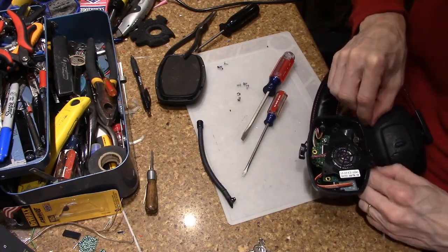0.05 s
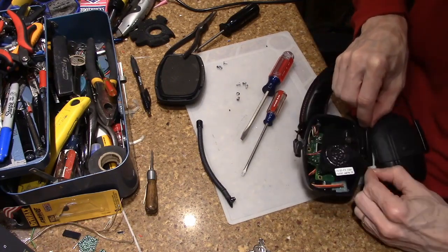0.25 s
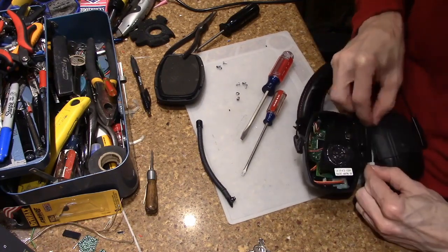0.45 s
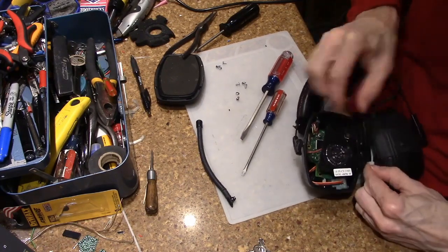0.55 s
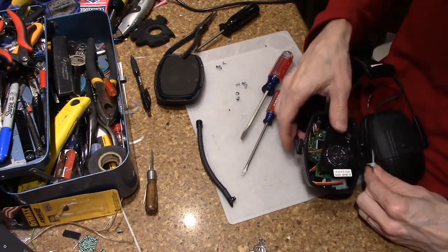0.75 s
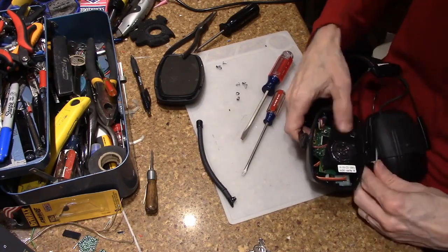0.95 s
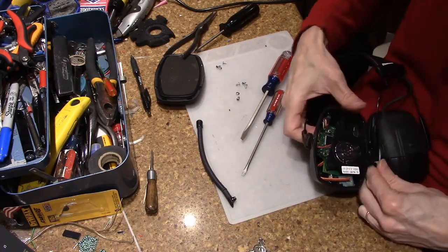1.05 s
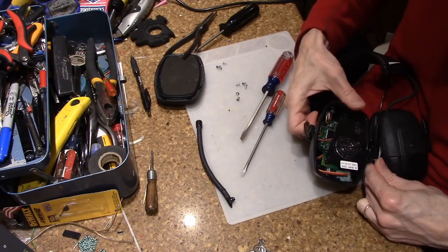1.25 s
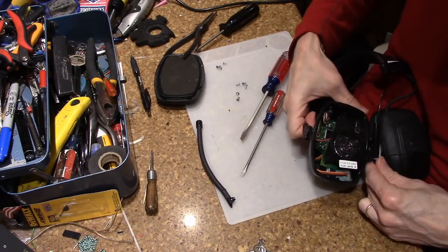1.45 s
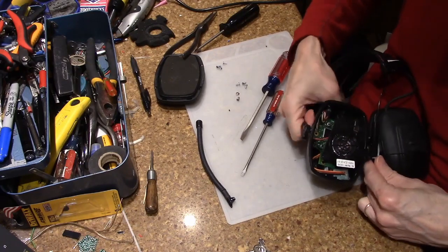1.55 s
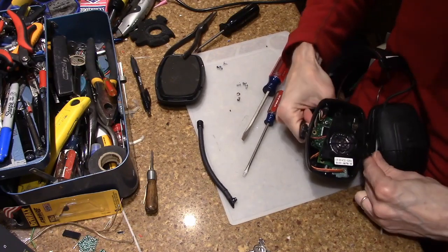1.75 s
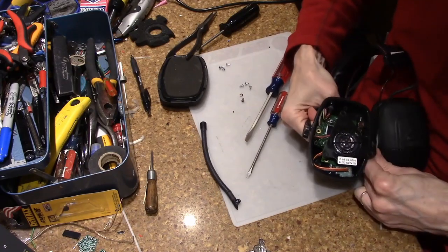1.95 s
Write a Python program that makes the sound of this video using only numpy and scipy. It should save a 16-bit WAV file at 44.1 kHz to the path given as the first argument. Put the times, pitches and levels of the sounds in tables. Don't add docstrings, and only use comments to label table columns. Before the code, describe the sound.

Plastic earmuff cups clatter sharply as a cable tie snaps tight, then small clicks and finger rubs

```python
import sys
import numpy as np
from scipy import signal
from scipy.fft import rfft, irfft
from scipy.io import wavfile

SR = 44100
rng = np.random.default_rng(int(sys.argv[2]) if len(sys.argv) > 2 else 0)


def natural_amplitude(level_db):
    exponent = np.asarray(level_db, float) / 20
    return 10 ** exponent


def master_out(mix):
    frames = np.transpose(np.atleast_2d(mix))
    ceiling = np.clip(frames, -1, 1)
    pcm = np.round(ceiling * 32767).astype(np.int16)
    wavfile.write(sys.argv[1], SR, pcm)


N = 88200
T = np.arange(N) / SR

# (time [s], peak level [dB], contact pitch [octaves from 2 kHz], chatter length [ms])
CUP_KNOCKS = [(.2315, -7.5, -0.7, 0.96), (.2318, -14, 1, 1.6), (.2445, -4.5, 1.4, 5.5), (.2462, -5, 0.9, 3),
              (.2505, -4, -0.4, 10.2), (.2618, -3.5, 1, 1.5), (.267, -8.5, -0.6, 2.7),
              (.2722, -14, 2.7, 2.3), (.2942, -8, 0, 1.18), (.2995, -14, 1, 3.6), (.3103, -11, -0.5, 1.1),
              (.3922, -22, 12, 1.7), (.3993, -24, 0.5, 2.2), (.421, -30, -1.4, 1.6)]
HEAD_SNAPS = [
    (.4404, -16.5, 1.24, 1.5),
    (.4431, -16.5, 0.25, 0.78),
    (.4478, -20, 1.4, 1.5),
    (.4547, -23, 1.6, 1.3),
    (.4662, -20, -1.1, 0.9),
    (.4658, -23.5, 1.15, 1.4),
]
LAST_TOOTH = [
    (1.2446, -24, 1.8, 2.6),
    (1.246, -11.5, 0.22, 0.94),
    (1.2505, -21, 0.053, 2.3),
    (1.2475, -26, -1.8, 9.5),
]
CUP_THUMPS = [
    (.9275, -24.5, -2.07, 2.3),
    (.936, -28.5, -1, 5.3),
    (0.96, -26, -2.3, 5.9),
    (.956, -31.5, -2.5, 3.4),
]
CUP_MORE_STRIKES = [(.232, -26, 3.5, 1.2), (.257, -10.5, -1.32, 6.1), (.271, -13, -1, 1.63), (.274, -9, -0.7, 4),
                    (.304, -18, 0.5, 3.9), (.437, -27, -1.4, 3.3), (.9415, -35, -1.4, 2.4),
                    (.964, -33, -0.3, 4.8), (.897, -39, -1.5, 2.5), (.036, -40, -3, 6.5), (.672, -51, 2.2, 3),
                    (1.256, -39.5, 5.7, 1.7), (1.279, -38, 1, 2)]
SHELL_PINGS = [(.254, -9.5, -1.28, 5.1), (.252, -13.5, -0.7, 5.6), (.295, -19.5, -0.4, 2.2),
               (.4665, -24, -0.9, 0.92), (.7952, -33.5, 0, 0.35), (.8445, -44.5, 1.8, 3),
               (.928, -34, -2, 1.2), (1.2455, -37, 1.5, 1.2), (1.2515, -42, 2.5, 4),
               (1.2925, -28, -0.14, 1), (1.3248, -34.5, -0.07, 1.1), (1.329, -40.5, -0.6, 2.7)]
PART_TICKS = [(.533, -34.5, 0.9, 10), (.636, -45, 0.1, 5.9), (.826, -43.5, -3.5, 4.3),
              (.8435, -37.5, 1.5, 6.4), (.860, -38, -0.5, 5), (.9035, -29, 0.1, 0.68),
              (1.0345, -34, 0.5, 3.4), (1.045, -32, -0.8, 5.8), (1.05, -44, -1.5, 3.7),
              (1.096, -36, -1, 6.4), (1.2642, -33, -0.1, 3), (1.2732, -29.5, -0.5, 2.1),
              (1.2924, -24, -0.1, 0.59), (1.2926, -32, 0.7, 1.1), (1.311, -33, 0.8, 1.8),
              (1.3245, -28, 0.03, 0.75), (1.327, -31.5, -1.5, 4), (1.358, -56, 5, 4.9),
              (1.37, -48, -1.5, 3.7), (1.469, -43.5, 1, 1.8), (1.477, -37, 0.3, 2.5), (1.556, -39, 0, 4.6),
              (1.673, -40, 0.8, 3.7)]
TIE_SCUFFS = [(.010, -27.5, 1.1, 2.1), (.1935, -29, 1.8, 0.86), (.194, -29.5, 0, 2.6),
              (.7682, -35, 1.2, 12), (.795, -30.5, -0.1, 1.4), (.8095, -33.5, -0.1, 2),
              (.843, -36, -0.5, 17), (1.002, -34.5, 1.3, 3.4), (1.175, -45, 7, 2.2),
              (1.2447, -42, -3.5, 2.2), (1.42, -51.5, 3, 35), (1.59, -45, 0.47, 115),
              (1.838, -48.5, 1.2, 47), (1.871, -39, -0.7, 2.3), (1.959, -43, 0.5, 1.9)]
SKIN_SCRAPES = [
    (.930, -33, 0.48, 65),
    (.936, -38, 1.07, 35),
    (.535, -36.5, 0.35, 26),
    (1.097, -38, 0.33, 17),
    (1.19, -43.5, 0.12, 37),
    (1.558, -43.5, 0.62, 15),
]
# (time [s], level [dB], push length [ms])
BENCH_THUDS = [
    (0.042, -41, 2.56),
    (0.081, -64.5, 4.3),
    (.256, -43, 0.68),
    (0.267, -25.5, 4.2),
    (0.298, -27, 3.9),
    (0.47, -37.5, 8),
    (0.781, -41.5, 4.6),
    (0.957, -63, 1.3),
    (1.255, -40, 2.7),
]
# (time [s], level [dB])
RUB_LEVEL = [(0.0, -55), (0.26, -94), (0.37, -66), (0.41, -42), (0.52, -43.5), (0.58, -78.5), (0.82, -47),
             (0.94, -49), (1.16, -48), (1.34, -54), (1.46, -53.5), (1.5, -64), (1.535, -54), (1.68, -54),
             (1.775, -62.5), (1.84, -51), (1.96, -51.5), (2.0, -61)]
# (time [s], resonance [Hz], level [dB])
LAST_SLIDE = [
    (1.81, 975.5, -71),
    (1.85, 1006, -49),
    (1.9, 1244, -46),
    (1.95, 1532, -42),
    (1.969, 1560, -46.5),
    (1.985, 1470, -75),
]

# (frequency [Hz], level [dB], t60 [s])
CUP_MODES = [(277, -7, 0.094), (452, -8.5, 0.1), (536, -9, 0.075), (703, 0.5, 0.019), (967, -9.5, 0.02),
             (1351, -0.5, 0.025), (1550, -6, 0.018), (1938, -6, 0.035), (2889, -2, 0.044),
             (3046, 1.5, 0.044), (3430, -13, 0.019), (4815, -11.5, 0.065), (6265, -2, 0.016),
             (7440, -16, 0.011)]
# (frequency [Hz], level
# [dB], t60 [s])
HEAD_MODES = [(830, -3, 0.024), (1026, -1, .035), (1746, -2, 0.014), (1930, -6.5, 0.044), (2240, 1, 0.0066),
              (2962, 0.5, 0.027), (3690, -21.5, 0.012), (4650, -7, .018), (5800, -7.5, 0.017),
              (6237, 1, 0.017), (7540, -6, 0.009), (8160, -12, 0.022), (8960, -5.5, 0.018),
              (9400, -6, 0.017)]
# (frequency [Hz], level [dB], t60 [s])
SHELL_MODES = [(559.6, 0.5, 0.034), (722, -1, 0.11), (1039, -0.5, 0.055), (1352.5, -1.5, 0.075),
               (1844, 0.5, 0.048), (6270, 0.5, .03), (8750, 0.5, 0.044)]
# (frequency [Hz], level [dB], t60 [s])
PART_MODES = [(1007, -2.5, 0.021), (1751, 1.5, 0.0095), (1865, -1, 0.039), (2188, -4.5, 0.021),
              (2880, -6.5, 0.017), (4840, -13, 0.048), (6385, 0, 0.016), (7640, -7, 0.014)]
# (frequency [Hz], level [dB], t60 [s])
BENCH_MODES = [(67, -18.5, 0.067), (107.3, -10, 0.33), (186, -7.5, 0.063), (304, 0, 0.045),
               (440, -38.5, 0.24), (527.7, 11.5, 0.14)]
# (frequency [Hz], t60 [s], level [dB], side level re mid [dB])
ROOM_DECAY = [(135, 0.64, -7, -46.5), (342, 0.52, -4, -31.5), (880, 0.33, -6, -46), (1460, 0.43, -7, -38),
              (3340, 0.33, -11.5, -16), (6010, 0.43, -14, -13), (11500, 0.2, -18, -10)]
# (frequency [Hz], density [dB per Hz])
FLOOR_SPECTRUM = [(18, -42), (30, -4.5), (165, -8), (245, -4.5), (554, -6.5), (1320, -12.5), (1720, -11.5),
                  (11100, -31.5), (16000, -32)]

GRAIN_DB, DETUNE, RISE_S, RATTLE_S = 1.96, 0.0081, 0.001, 0.021
CRACK_WIDTH, BODY_LOW_HZ = 1.41, 215
RUB_DB, RUB_DAMPING, RUB_GRAIN_DB = -2.5, 0.32, 2.5
RUB_HISS_DB, RUB_HISS_HZ, RUB_SWELL_DB, RUB_SWELL_HZ = -4, 2960, 1, 22
SLIDE_WIDTH_HZ = 640
DIRECT_SIDE_DB, DIRECT_SIDE_HZ = -18.5, 4030
ROOM_ONSET_S = 0.00067
FLOOR_DB, FLOOR_SIDE_DB = -55.5, -8.5
MIC_LOW_HZ, MIC_TOP_HZ, CUT_HZ = 73, 13000, 16300


def band(x, hz, width):
    hz = np.clip(hz, 20, .44 * SR)
    return signal.lfilter(*signal.iirpeak(hz, hz / width, SR), x)


def ring(x, hz, t60):
    pole = np.exp(2j * np.pi * hz / SR - np.log(1000) / (t60 * SR))
    return signal.lfilter([1], [1, -pole], x).imag


def unit(x):
    return x / np.sqrt(np.mean(x ** 2))


def add(out, at_s, x):
    i = max(int(at_s * SR), 0)
    out[i:i + len(x)] += x[:N - i]


def grit(size, grain_db):
    chance = rng.random(size)
    return rng.standard_normal(size) * natural_amplitude(-grain_db * np.log(1 - chance))


def strikes(events, modes, body_db, crack_db, scatter_db, rattle_db, focus_db=3, size=9000):
    out, t = np.zeros(N), T[:size]
    for at_s, peak_db, octave, ms in events:
        chatter_s = ms / 1000
        contact = (1 - np.exp(-t / RISE_S)) * np.exp(-(t / chatter_s) ** 2)
        grains = unit(grit(size, GRAIN_DB))
        push = grains * (contact + natural_amplitude(rattle_db) * np.exp(-t / RATTLE_S))
        drive = np.abs(grains) * contact
        drive = drive / np.sum(drive)
        body = 0
        for hz, db, t60 in modes:
            level_draw, tune_draw, phase_draw = rng.standard_normal(3)
            hz = hz * (1 + DETUNE * tune_draw)
            db = db - focus_db * (np.log2(hz / 2000) - octave) ** 2 + scatter_db * level_draw
            held = 1 + chatter_s * np.log(1000) / t60
            carrier = np.exp(1j * (2 * np.pi * hz * t + 20 * phase_draw))
            body = body + natural_amplitude(db) * held * ring(drive * carrier, hz, t60)
        hz = min(2000 * 2 ** octave, .3 * SR)
        crack = band(band(push, hz, CRACK_WIDTH * hz), hz, CRACK_WIDTH * hz)
        crack = crack / np.abs(crack).max() * 2
        add(out, at_s, natural_amplitude(peak_db) * (natural_amplitude(body_db) * body + natural_amplitude(crack_db) * crack))
    return signal.sosfilt(signal.butter(2, BODY_LOW_HZ, "high", fs=SR, output="sos"), out)


def cups():
    knocks = strikes(CUP_KNOCKS, CUP_MODES, -11.5, -5, 0, -14)
    thumps = strikes(CUP_THUMPS, CUP_MODES, -11, -8, 0, -14, focus_db=5)
    more_strikes = strikes(CUP_MORE_STRIKES, CUP_MODES, -11, -8, 0, -14, focus_db=5)
    return knocks + thumps + more_strikes


def tie_head():
    snaps = strikes(HEAD_SNAPS, HEAD_MODES, -8, -8.5, 1.5, -16.5, focus_db=6.5)
    tooth = strikes(LAST_TOOTH, HEAD_MODES, -8, -8.5, 1.5, -16.5, focus_db=6.5)
    return snaps + tooth


def shell_pings():
    return strikes(SHELL_PINGS, SHELL_MODES, 0, -40, 0, -40, focus_db=60)


def loose_part():
    return strikes(PART_TICKS, PART_MODES, -8, -9, 1.5, -22.5, focus_db=4)


def scuffs():
    tie = strikes(TIE_SCUFFS, CUP_MODES, -17, -5.5, 0, -17)
    skin = strikes(SKIN_SCRAPES, CUP_MODES, -27, -5.5, 0, -17)
    return tie + skin


def bench(size=20000):
    out = np.zeros(N)
    for at_s, db, ms in BENCH_THUDS:
        push = np.sin(np.pi * np.clip(T[:size] / (ms / 1000), 0, 1))
        push = push / push.sum()
        thud = sum(natural_amplitude(mode_db) * ring(push, hz, t60) for hz, mode_db, t60 in BENCH_MODES)
        add(out, at_s, natural_amplitude(db) * thud)
    return out


def fingers():
    drag = grit(N, RUB_GRAIN_DB)
    modes = sum(natural_amplitude(db) * ring(drag, hz, RUB_DAMPING * t60) for hz, db, t60 in HEAD_MODES)
    shell = unit(band(modes, 1800, 3300))
    hiss = unit(band(band(drag, RUB_HISS_HZ, 8300), 4730, 7000))
    hiss = hiss * natural_amplitude(RUB_SWELL_DB * unit(band(drag, RUB_SWELL_HZ, RUB_SWELL_HZ)))
    rub_s, rub_db = np.array(RUB_LEVEL).T
    rub = natural_amplitude(RUB_DB + np.interp(T, rub_s, rub_db)) * (shell + natural_amplitude(RUB_HISS_DB) * hiss)

    slide_s, slide_hz, slide_db = np.array(LAST_SLIDE).T
    slow = unit(signal.lfilter(*signal.butter(2, SLIDE_WIDTH_HZ / 2, fs=SR), grit(N, 2.1)))
    phase = 2 * np.pi * np.cumsum(np.interp(T, slide_s, slide_hz)) / SR
    slide = slow * np.sin(phase) * natural_amplitude(np.interp(T, slide_s, slide_db, -120, -120))
    return rub + slide


def room(x, size=30000):
    t, tail = T[:size], 0
    for hz, t60, db, side_db in ROOM_DECAY:
        fade = (1 - np.exp(-t / ROOM_ONSET_S)) * natural_amplitude(-60 * t / t60)
        noise = band(band(rng.standard_normal((2, size)), hz, hz), hz, hz)
        noise = noise * fade / np.sqrt(np.sum(fade ** 2))
        tail = tail + noise * natural_amplitude(np.array([[db], [db + side_db]]))
    return signal.fftconvolve(x[None], tail, axes=1)[:, :N]


def floor():
    hz, db = np.array(FLOOR_SPECTRUM).T
    gain = natural_amplitude(np.interp(np.log(np.fft.rfftfreq(N, 1 / SR) + 1), np.log(hz), db))
    mid, side = (unit(irfft(rfft(rng.standard_normal(N)) * gain, N)) for _ in range(2))
    return natural_amplitude(FLOOR_DB) * np.array([mid, natural_amplitude(FLOOR_SIDE_DB) * side])


def scene():
    near = cups() + tie_head() + shell_pings() + loose_part() + scuffs() + bench() + fingers()
    edge = band(near, DIRECT_SIDE_HZ, DIRECT_SIDE_HZ)
    near_side = natural_amplitude(DIRECT_SIDE_DB) * np.gradient(edge) * SR / (2 * np.pi * DIRECT_SIDE_HZ)
    mid, side = np.array([near, near_side]) + room(near) + floor()
    return np.array([mid + side, mid - side])


def roll_off(x):
    return signal.sosfilt(signal.butter(12, 16820, fs=SR, output="sos"), x)


def record(dry):
    mic = signal.sosfilt(signal.butter(4, MIC_LOW_HZ, "high", fs=SR, output="sos"), dry)
    mic = signal.sosfilt(signal.butter(2, MIC_TOP_HZ, fs=SR, output="sos"), mic)
    rounded = np.tanh(0.75 * mic) / 0.8
    cut = signal.ellip(8, .2, 60, CUT_HZ, fs=SR, output="sos")
    return roll_off(signal.sosfilt(cut, rounded))


dry = scene()
out = record(dry)
master_out(out)
```